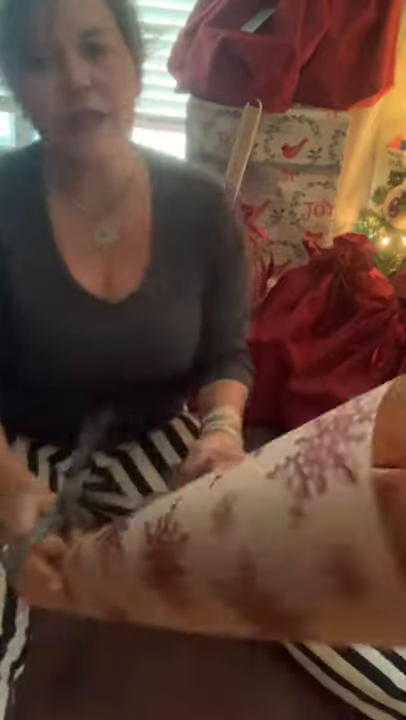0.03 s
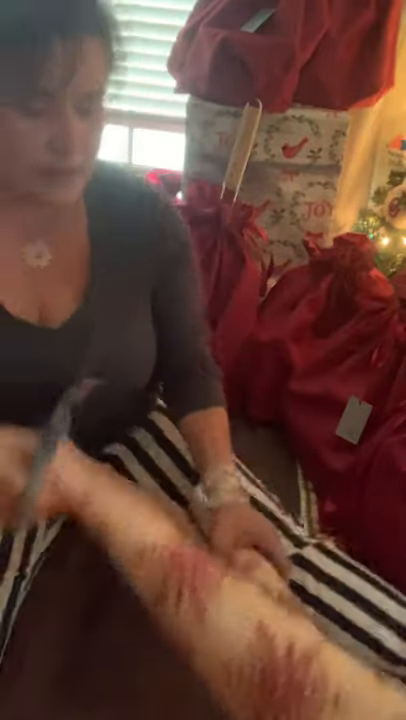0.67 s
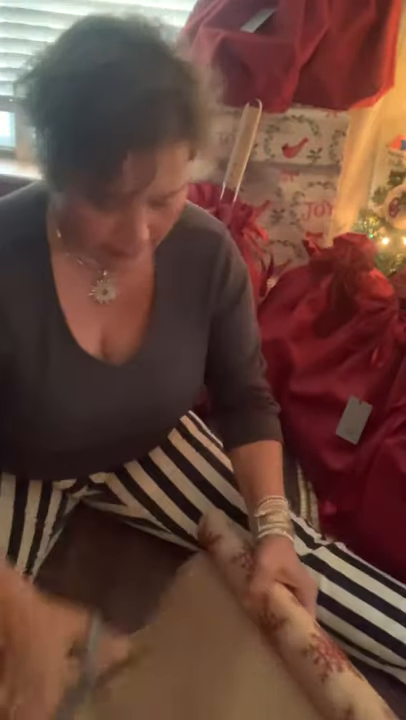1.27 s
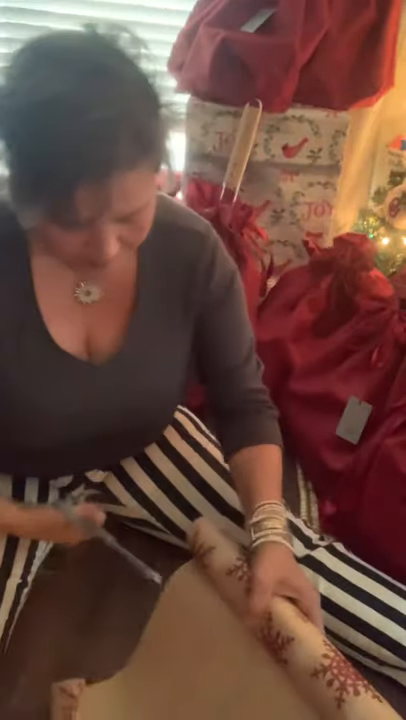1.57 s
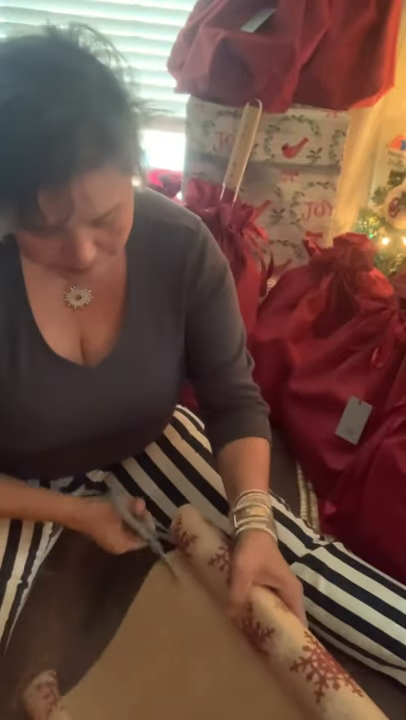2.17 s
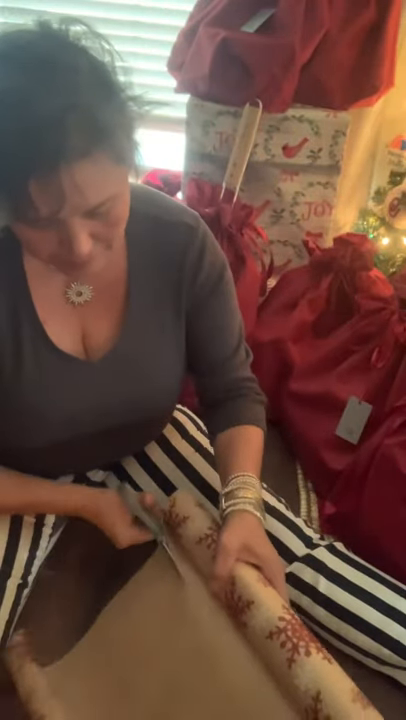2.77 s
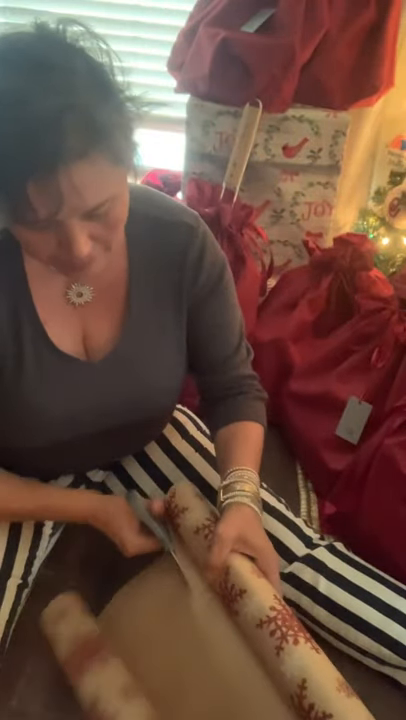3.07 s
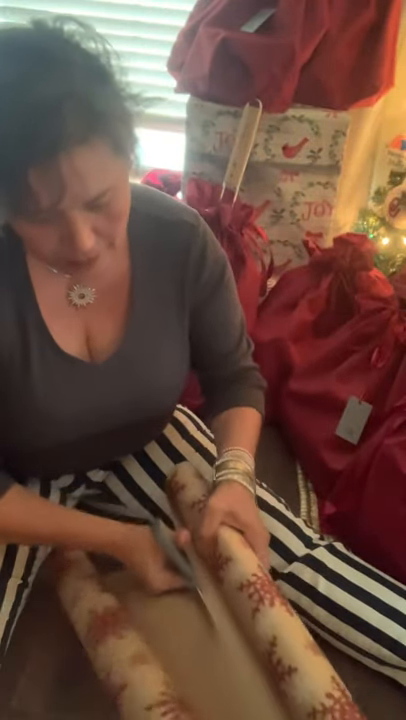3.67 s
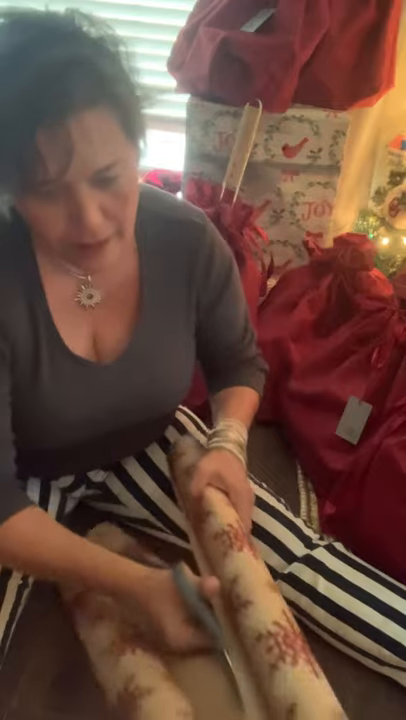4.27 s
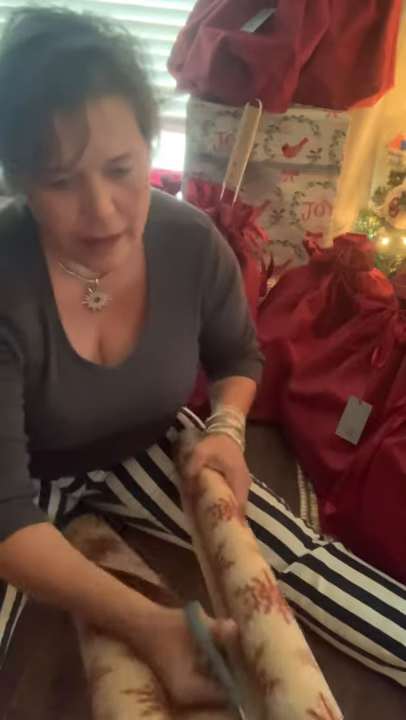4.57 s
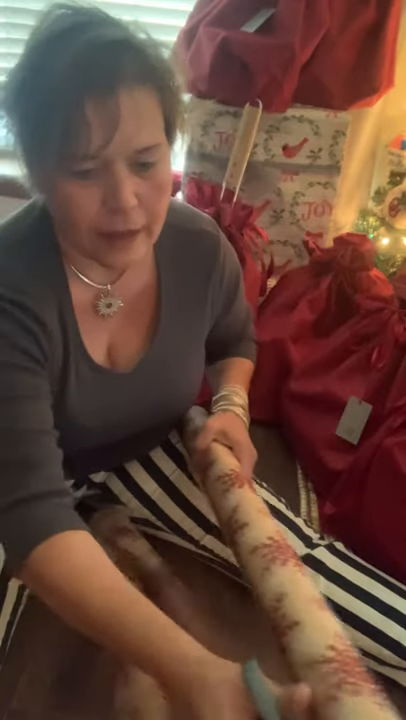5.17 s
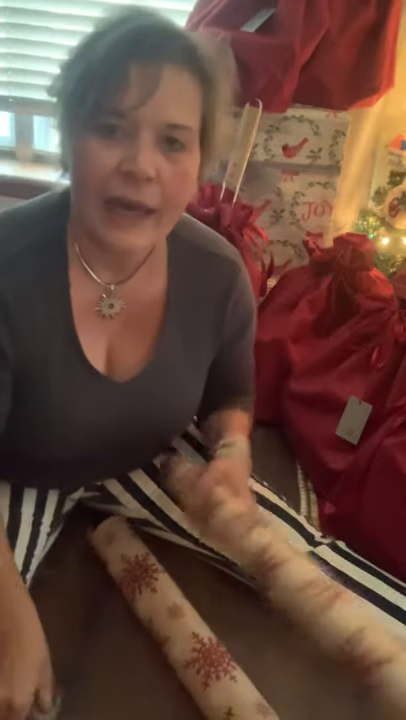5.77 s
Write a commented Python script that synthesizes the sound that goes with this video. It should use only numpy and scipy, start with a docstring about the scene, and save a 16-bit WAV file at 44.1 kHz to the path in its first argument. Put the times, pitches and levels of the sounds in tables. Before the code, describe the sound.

Wrapping paper is pulled off its roll, flapping and crinkling with sharp crackles and a few scissor clicks. Open scissors then glide through the sheet in one long, swelling rasp and hiss. The cut piece curls up, the cardboard roll bumps the floor, and the scissors are laid down with clicks and a brief metallic ring. A phone hears it from about a metre away in a quiet living room.

```python
"""Cutting wrapping paper

Paper is pulled off its roll on a living-room floor, then open scissors glide through it in one long cut.
Many tiny snaps make the sheet flap, crinkle and hiss, and the blade rasps as it sticks and slips.
The cut piece curls up, the cardboard roll bumps the floor and the scissors are laid down, ringing.
A phone with two microphones hears it from about a metre away, over a quiet rumble and hum."""
import sys
import numpy as np
from scipy import signal
from scipy.fft import rfft, irfft, next_fast_len
from scipy.io import wavfile
from scipy.ndimage import uniform_filter1d, map_coordinates

SR = 44100
rng = np.random.default_rng(int(sys.argv[2]) if len(sys.argv) > 2 else 0)


def log_audio(samples):
    """Write samples as a 16-bit WAV file to the path given in sys.argv[1]."""
    # one column per channel
    frames = np.atleast_2d(samples).T
    # limit to full scale, then quantise
    limited = np.clip(frames, -1, 1)
    pcm = np.round(limited * 32767).astype(np.int16)
    wavfile.write(sys.argv[1], SR, pcm)


N = 265173
T = np.arange(N) / SR
SIZE = next_fast_len(N + SR // 2, True)
FREQ = np.maximum(np.arange(SIZE // 2 + 1) * SR / SIZE, 1)

# the sheet is lifted, swung or bent: (start [s], length [s], flapping [dB], crinkling [dB])
SHEET_BENDS = [(0.0, 0.085, -35.5, -50), (0.147, 0.23, -36.5, -31.5), (0.291, 0.054, -36, -25),
               (0.387, 0.11, -38, -31.5), (0.526, 0.12, -40, -34.5), (0.673, 0.16, -45.5, -37.5),
               (0.816, 0.14, -34, -34), (0.88, 0.032, -31, -21.5), (0.988, 0.072, -36.5, -33),
               (1.083, 0.11, -39.5, -37.5), (1.171, 0.047, -32, -27), (1.23, 0.021, -49, -30),
               (1.283, 0.055, -38, -33), (1.444, 0.2, -47, -44.5), (1.836, 0.013, -38.5, -39),
               (1.889, 0.034, -37.5, -32), (2.12, 0.41, -46.5, -37.5), (2.592, 0.022, -36, -31.5),
               (2.613, 0.1, -35.5, -33.5), (2.739, 0.045, -38.5, -32), (4.653, 0.12, -30.5, -40),
               (5.154, 0.016, -43, -27), (5.245, 0.02, -29, -27.5), (5.409, 0.099, -34.5, -33.5),
               (5.589, 0.054, -37.5, -58), (5.724, 0.022, -34, -52)]
# the sheet slides over itself or the floor: (start [s], length [s], hiss [dB])
SHEET_SLIDES = [(-0.02, 0.058, -29.5), (0.17, 0.036, -29), (0.46, 0.25, -38), (0.815, 0.048, -35),
                (1.07, 0.11, -43.5), (1.315, 0.019, -28.5), (1.39, 0.19, -38.5), (1.705, 0.036, -46),
                (1.915, 0.091, -42), (2.056, 0.045, -39.5), (2.14, 0.075, -33.5), (2.232, 0.14, -27.5),
                (2.39, 0.15, -34), (2.63, 0.12, -32.5), (3.44, 0.041, -32), (4.875, 0.016, -24),
                (5.415, 0.11, -33), (5.575, 0.048, -36), (5.712, 0.024, -32)]
# the sheet buckles: (time [s], level [dB], treble boost [dB])
SHEET_BUCKLES = [(0.09, -27, 5), (0.163, -22.5, 0.5), (0.244, -17.5, -24), (0.272, -13, -9),
                 (0.307, -21, 4.5), (0.465, -19.5, -8), (0.549, -21, -6), (0.669, -22, -3),
                 (0.79, -20.5, -9), (0.865, -18.5, -7), (0.903, -15.5, -6), (0.958, -16, -2),
                 (1.163, -17, 1), (1.188, -14.5, -23), (1.248, -20, -5), (1.279, -20, -13),
                 (1.334, -17.5, -18), (1.598, -25, -2), (2.106, -23, -27), (2.285, -24, 7),
                 (2.584, -19.5, -6), (2.665, -15.5, -27), (2.76, -23, -14), (4.138, -12, -16),
                 (4.331, -9, -4), (4.475, -14, -3), (4.872, -16, 1), (5.205, -10, -3.5),
                 (5.218, -17.5, -10)]
# the long cut: (time [s], slicing level [dB], crinkling compared with the slicing [dB])
LONG_CUT = [(2.8, -56, 0), (2.81, -46.5, 8), (2.89, -34, 1), (3.2, -30, 0.5), (3.48, -26.5, -3),
            (3.72, -29, -1), (4.32, -22.5, -2), (4.83, -25, -3), (4.89, -22.5, -4), (4.96, -25.5, -2),
            (5.02, -26, 1), (5.13, -29.5, 0.5), (5.23, -37.5, 0), (5.37, -59, -6)]
# the scissors click; the last three columns are compared with the level:
# (time [s], level [dB], treble boost [dB], high ping [dB], ring of the blades [dB])
SCISSOR_CLICKS = [(0.997, -11.5, 0, 6, -48), (1.638, -34.5, 9, -18, -23), (1.663, -29, 4, 6, -35),
                  (2.029, -23.5, -9, -20, -39), (2.107, -9, -13.5, -22, -43), (2.131, -33.5, 10, -18, -16),
                  (2.626, -2.5, -13.5, -9, -46), (5.208, -20, -6, -18, -20), (5.419, -17.5, -2, -18, -33),
                  (5.585, -33, 4, -21, -7.5), (5.760, -9.5, -3.5, -15, -33), (5.795, -17.5, -1, -17, -20),
                  (5.844, -11.5, -5.5, -23, -19.5), (5.861, -20, -7, -18, -14), (5.934, -23, -23, -28, -15)]
# the cardboard roll is bumped: (time [s], level [dB])
ROLL_BUMPS = [(1.002, -30), (4.485, -26), (4.885, -25), (5.42, -16), (5.448, -23.5), (5.491, -34)]

# bands of rubbing noise that glide in pitch: (time [s], pitch [Hz], level [dB])
BLADE_SCRAPE_GLIDE = [(3.8, 3754, -36), (4.05, 3900, -35), (4.46, 4020, -42), (4.56, 3780, -26.5),
                      (4.68, 3470, -28), (4.8, 3200, -41), (5.05, 2980, -37)]  # paper scrapes over the blade
TAUT_SHEET_GLIDE = [(3.1, 1980, -62), (3.52, 2108, -34), (3.8, 2000, -48), (4.2, 2240, -35.5),
                    (4.4, 2203, -30.5), (4.66, 2094, -43)]  # the tight sheet resonates at the blade
EDGE_HISS_GLIDE = [(2.84, 12300, -51), (2.92, 12070, -30.5), (3.33, 12400, -41), (3.48, 12840, -28),
                   (3.8, 10300, -40), (4.1, 11400, -31)]  # the cutting edge hisses
BILLOW_GLIDE = [(0.22, 419, -55), (0.26, 404, -32.5), (0.34, 348.4, -50), (0.46, 313, -42)]  # the sheet billows
ROLL_SCRAPE_GLIDE = [(0.31, 3850, -20.5), (0.35, 3376, -26)]  # paper scrapes over the roll
CURL_GLIDE = [(3.6, 760, -47), (4.1, 749, -35.5), (4.6, 730, -49), (4.9, 672, -32), (5.08, 700, -41),
              (5.19, 650, -25), (5.25, 593, -25), (5.36, 540, -66)]  # the cut piece curls up

# the tones a struck object rings with: (pitch [Hz], level [dB], time to fade by 60 dB [s])
OPEN_BLADE_TONES = [(2930, -5, .7), (3822, -2, .9), (5712, -6, .65), (6995, -7, .45), (7620, -2, .4)]
SHUT_BLADE_TONES = [(1202, -7, .8), (2896, 0, .24), (3004, -5, .5), (3500, 7, .05), (7224, -2, .25),
                    (7827, -4, .3)]
ROLL_TONES = [(330, -10.5, 0.089), (483, -5, 0.3), (571, -1, 0.14), (641.5, 1.5, 0.12), (810, -18, 0.23),
              (1090, -22, 0.05), (2150, -8, 0.12)]
# the steady tones of mains hum: (pitch [Hz], level [dB])
HUM_TONES = [(59.3, -58.5), (120, -64)]

# tone colours, or how strong each noise is from low to high: (frequency [Hz], relative level [dB])
FLAP_COLOUR = [(100, -27.5), (150, -20.5), (280, -12.5), (400, -4), (500, -2.5), (680, 3.5), (1050, -3.5),
               (1500, -9), (3000, -36.5)]
CRINKLE_COLOUR = [(400, -29.5), (900, 0.5), (1400, -1), (2000, 1.5), (2600, -2.5), (3200, -0.5),
                  (4400, -6.5), (8000, -14.5), (15000, -37)]
HISS_COLOUR = [(1500, -27), (4500, 1), (6500, -4.5), (7800, -3), (9300, 2), (12000, 3), (13300, -4),
               (14500, -8.5), (16000, -26)]
DRUM_COLOUR = [(190, -35.5), (300, -2), (460, 6.5), (650, 0.5), (950, 2.5), (1400, -30.5)]  # the sheet under the blade
BUCKLE_COLOUR = [(100, -24), (300, -8), (650, 3.5), (1500, 3.5), (2200, 2), (4000, -1), (6500, -9),
                 (11000, -2.5), (15000, -25)]
CLICK_COLOUR = [(200, -10.5), (800, -6), (2000, 3.5), (3700, 5), (6500, 5), (9000, 6.5), (12000, 11.5),
                (16000, -11)]
THUD_COLOUR = [(40, -26), (80, -6), (125, 5), (200, -14), (600, -36)]  # the floor under the roll
RUMBLE_COLOUR = [(20, -9), (35, -4), (80, -3), (150, -12), (300, -7.5), (1000, -20.5), (16000, -29.5)]  # the quiet house

# how alike the two microphones sound: (frequency [Hz], likeness [0 to 1])
MIC_LIKENESS = [(150, .96), (550, .88), (1050, .75), (1250, .35), (1500, .55), (2200, .65), (2700, .3),
                (5000, .3), (5800, .4), (6400, .97), (7400, .9), (8300, .35), (9200, .8), (10200, .2),
                (12000, .65), (13600, .95)]
# how far the right one trails the left: (frequency [Hz], phase lag [rad])
MIC_LAG = [(100, 0), (400, -.6), (750, -1.6), (1100, -1.5), (1300, -.5), (2500, -.3), (3300, -1.4),
           (4300, -.3), (5000, -1.5), (5800, 0), (6400, 2.9), (6800, 3.4), (7400, 6.28), (8300, 9.4),
           (9200, 12.57)]
# how much louder the left one is: (frequency [Hz], left minus right [dB])
MIC_BALANCE = [(60, 13), (200, 4), (450, 7.5), (1250, 1.5), (2400, 9), (4400, 7), (6500, 2), (9500, 0.5),
               (11800, -2.5), (13500, -1)]


def paper():
    """The wide sheet flaps, its creases crinkle, and its surface and the sliced fibres hiss."""
    flapping, crinkling, hissing, cut = handling()
    catch = flicker(rate_hz=39)  # the paper catches and slips
    flap = colour(tiny_snaps(per_s=800, spread_db=2.5, decay_s=0.0027), FLAP_COLOUR)
    flap *= flapping * undb(1.2 * catch)
    creases = colour(tiny_snaps(per_s=2000, spread_db=2, decay_s=0.0022), CRINKLE_COLOUR)
    creases *= undb(1.03 * catch)
    hiss = colour(tiny_snaps(per_s=1900, spread_db=0, decay_s=0.0053), HISS_COLOUR)
    hiss *= hissing * undb(0.8 * flicker(rate_hz=59))
    rustle = flap + creases * crinkling + hiss + drumming(cut, catch)
    singing = singing_blades(cut * creases)
    return shifting_bands(floor_echo(rustle)) + undb(-22.5) * singing


def handling():
    """How strongly bending, sliding and cutting make the sheet flap, crinkle and hiss at each moment."""
    bends = np.array(SHEET_BENDS)
    swing = strokes(bends[:, [0, 1, 2]], attack_s=0.015, release_s=0.029)
    bend = strokes(bends[:, [0, 1, 3]], attack_s=0.015, release_s=0.029)
    slide = strokes(SHEET_SLIDES, attack_s=0.014, release_s=0.031)
    cut_db, cut_crinkle_db = over_time(LONG_CUT)
    cut = undb(cut_db) * during(LONG_CUT)
    held_flap, held_crinkle = undb(-54.5), undb(-48.5)  # the sheet is never quite still in the hand
    flap = together(swing, undb(-19) * cut ** 0.62, held_flap)  # grows more slowly than the slicing
    crinkle = together(bend, undb(-6) * slide, undb(cut_crinkle_db) * cut, held_crinkle)
    hiss = together(slide, undb(-16) * bend, undb(1.5) * cut)
    return flap, crinkle, hiss, cut


def slicing():
    """Fibres snap one by one as the blade sticks and slips, which also roughens its rubbing noises."""
    rasp = unit_rms(undb(3 * flicker(rate_hz=110)))
    snaps = tiny_snaps(per_s=300, spread_db=4, decay_s=0.0005)
    cut_db, _ = over_time(LONG_CUT)
    fibres = colour(snaps, CLICK_COLOUR) * undb(cut_db - 6) * during(LONG_CUT)
    scrape = glide(BLADE_SCRAPE_GLIDE, width_hz=390)
    taut_sheet = glide(TAUT_SHEET_GLIDE, width_hz=170)
    edge_hiss = glide(EDGE_HISS_GLIDE, width_hz=2300)
    return fibres + rasp * (scrape + taut_sheet + edge_hiss)


def drumming(cut, catch, full_at_db=-29.5):
    """The sheet drums under the blade, growing louder until the slicing reaches full_at_db."""
    drum = colour(tiny_snaps(per_s=400, spread_db=2.5, decay_s=0.0085), DRUM_COLOUR)
    strength = during(LONG_CUT) * np.minimum(cut / undb(full_at_db), 1)
    return drum * strength * undb(-41.5 + 2 * catch)


def singing_blades(shaking):
    """The crinkling paper shakes the open blades, so the steel sings along."""
    steel = ring(OPEN_BLADE_TONES)
    return filtered(shaking, rfft(steel / np.linalg.norm(steel[0]), SIZE))


def unrolling_and_curling():
    """The sheet billows and scrapes over its roll; later the cut piece resonates as it curls up."""
    billow = glide(BILLOW_GLIDE, width_hz=140)
    scrape = glide(ROLL_SCRAPE_GLIDE, width_hz=2600)
    curl = glide(CURL_GLIDE, width_hz=117)
    return billow + scrape + curl


def buckles():
    """Each buckle of the sheet is a quick avalanche of snaps, heard as a rough burst of noise."""
    body, bright = np.zeros((2, 2, N))
    for time_s, db, treble_db in SHEET_BUCKLES:
        snap = undb(db) * burst(decay_s=0.014, rise_s=0.002)
        add(body, time_s, snap)
        add(bright, time_s, snap * (undb(treble_db) - 1))
    uneven = unit_rms(undb(1.8 * flicker(rate_hz=730)))
    return colour((body + treble(bright, corner_hz=5700)) * uneven, BUCKLE_COLOUR)


def scissors(ping_hz=9250, ping_fade_s=0.004, shut_at_s=5.785, choke_s=0.012):
    """Steel meets steel or the floor: a dry crack, a short high ping and the ring of the blades."""
    body, bright, pings, opened, shut = np.zeros((5, 2, N))
    ping = ring([(ping_hz, 0, ping_fade_s)])
    for time_s, db, treble_db, ping_db, ring_db in SCISSOR_CLICKS:
        snap = burst(decay_s=0.0024, rise_s=0.0001)
        tail = undb(-5.5) * burst(decay_s=0.0092, rise_s=0.00091)
        crack = undb(db) * (snap + tail)
        add(body, time_s, crack)
        add(bright, time_s, crack * (undb(treble_db) - 1))
        add(pings, time_s, undb(db + ping_db) * ping)
        track, tones = (opened, OPEN_BLADE_TONES) if time_s < shut_at_s else (shut, SHUT_BLADE_TONES)
        add(track, time_s, undb(db + ring_db) * ring(tones))
    cracks = colour(body + treble(bright, corner_hz=4800), CLICK_COLOUR)
    choke = np.exp(-np.maximum(T - shut_at_s, 0) / choke_s)  # shutting stops the open blades' ring
    rattle = unit_rms(undb(5 * flicker(rate_hz=110)))  # the blades chatter against each other
    return cracks + pings + (opened * choke + shut) * rattle


def cardboard_roll():
    """A bump gives a hollow knock from the tube, a slap from its paper and a thud from the floor."""
    knock, slap = np.zeros((2, 2, N))
    for time_s, db in ROLL_BUMPS:
        add(knock, time_s, undb(db) * ring(ROLL_TONES))
        add(slap, time_s, undb(db + 1.5) * burst(decay_s=0.017, rise_s=0.0004))
    thud = undb(-29) * colour(slap, THUD_COLOUR)
    paper_slap = undb(1.5) * colour(slap, FLAP_COLOUR) + undb(-11.5) * colour(slap, BUCKLE_COLOUR)
    return treble(knock, corner_hz=323) + thud + paper_slap


def shifting_bands(sound, rate_hz=11, depth_db=1.54, count=12):
    """The bending sheet sends out each frequency band more or less strongly from moment to moment."""
    place = np.interp(FREQ ** 0.5, [200 ** 0.5, 15000 ** 0.5], [0, count - 1])
    bands = (filtered(sound, np.maximum(1 - abs(place - k), 0)) for k in range(count))
    return sum(band * undb(depth_db * flicker(rate_hz)) for band in bands)


def floor_echo(sound, echo_db=-11):
    """The sound bounces off the floor and arrives a little late; the delay wanders as the sheet moves."""
    delay_s = 0.0016 + 0.000222 * uniform_filter1d(flicker(rate_hz=3), SR // 8)
    echo = np.array([map_coordinates(row, [(T - delay_s) * SR], order=1) for row in sound])
    return (sound + undb(echo_db) * echo) / together(1, undb(echo_db))


def room_echo(sound, fade_s=0.29, level_db=-7, count=6):
    """A furnished room adds a short echo; one tail blends into the next as the hands move."""
    place = T / T[-1] * (count - 1)
    echo, t = np.zeros((2, N)), T[:SR // 3]
    for k in range(count):
        tail = rng.standard_normal((2, len(t))) * (1 - np.exp(-t / 0.00024)) * undb(-60 * t / fade_s)
        near = abs(place - k) < 1
        part = sound[:, near] * np.sqrt(1 - abs(place[near] - k))
        add(echo, T[near][0], signal.fftconvolve(part, tail / np.linalg.norm(tail[0]), axes=1))
    return undb(level_db) * echo


def background():
    """Quiet house rumble and mains hum, nearly the same at both microphones."""
    hum = sum(undb(db) * np.sqrt(2) * np.sin(2 * np.pi * (hz * T + rng.random())) for hz, db in HUM_TONES)
    air = rng.standard_normal(N) + undb(-15) * rng.standard_normal((2, N))
    return undb(-54) * colour(air, RUMBLE_COLOUR) + hum


def tiny_snaps(per_s, spread_db, decay_s, patches=8, renew_s=0.16):
    """Each snap rings one small patch of paper; new patches keep forming as the sheet bends."""
    span, t = int(renew_s * SR), T[:SR // 60]
    spans, track = N // span + 1, np.zeros((2, N))
    when, patch, size, sign = rng.random((N // 8, 4))[:int(per_s * T[-1])].T
    place = (patch * patches).astype(int) * spans * span + (when * N).astype(int)
    strength = np.sign(sign - 0.5) * undb(spread_db * np.sqrt(3) * (2 * size - 1))
    kicks = np.bincount(place, strength, patches * spans * span).reshape(patches, 1, spans, span)
    rings = rng.standard_normal((patches, 2, spans, len(t))) * np.exp(-t / decay_s)
    pieces = signal.fftconvolve(kicks, rings, axes=-1).sum(axis=0)
    for k in range(spans):
        add(track, k * span / SR, pieces[:, k])
    return unit_rms(track)


def glide(rows, width_hz):
    """Rubbing noise in a band whose pitch glides as the paper changes shape."""
    hz, db = over_time(rows)
    sway = filtered(rng.standard_normal((2, 2, N)), 1 / (1 + (2 * FREQ / width_hz) ** 2))
    phase = 2 * np.pi * np.cumsum(hz) / SR
    band = unit_rms(sway[0] * np.cos(phase) + sway[1] * np.sin(phase))
    return band * undb(db) * during(rows) ** 2


def ring(tones):
    """The fading tones of a struck object: in step towards the listener, out of step to the sides."""
    hz, db, fade_s = np.transpose(tones)[:, :, None]
    t, gain = T[:SR], undb(db)
    waves = gain * np.exp((2j * np.pi * hz - np.log(1000) / fade_s) * t)
    start_turns = np.array([np.zeros(len(hz)), rng.random(len(hz))])
    return (np.exp(2j * np.pi * start_turns) @ waves).imag / np.sqrt(np.sum(gain ** 2) / 2)


def burst(decay_s, rise_s):
    """Noise that swells and dies, with different detail in two directions."""
    t = T[:SR // 4]
    return rng.standard_normal((2, len(t))) * np.exp(-t / decay_s) * (1 - np.exp(-t / rise_s))


def strokes(rows, attack_s, release_s):
    """The combined strength of hand movements that each swell, hold and die away."""
    power = np.zeros(N)
    for start_s, length_s, db in rows:
        swell = np.clip((T - start_s) / attack_s, 0, 1)
        fade = np.exp(-np.maximum(T - start_s - length_s, 0) / release_s)
        power += (undb(db) * swell * fade) ** 2
    return np.sqrt(power)


def flicker(rate_hz):
    """A smooth random wobble with a typical size of 1."""
    step = int(SR / rate_hz)
    stairs = np.repeat(rng.standard_normal(N // step + 1), step)[:N]
    return unit_rms(uniform_filter1d(stairs, step))


def during(rows, fade_s=0.022):
    """1 while a table lasts, fading to 0 outside it."""
    return np.clip(1 + np.minimum(T - rows[0][0], rows[-1][0] - T) / fade_s, 0, 1)


def over_time(rows):
    """Join the points of a time table, giving one curve for each column of values."""
    times, *columns = np.transpose(rows)
    return [np.interp(T, times, column) for column in columns]


def over_frequency(points):
    """Join the points of a frequency table into a curve."""
    hz, value = np.transpose(points)
    return np.interp(np.log(FREQ), np.log(hz), value)


def colour(sound, points):
    """Give a sound a tone colour; white noise keeps its power."""
    cepstrum = irfft(np.log(unit_rms(undb(over_frequency(points)))), SIZE)
    # fold the filter so that it rings only after a snap, never before
    cepstrum[1:SIZE // 2] *= 2
    cepstrum[SIZE // 2 + 1:] = 0
    return filtered(sound, np.exp(rfft(cepstrum)))


def treble(sound, corner_hz):
    """The part of a sound above a corner frequency."""
    return filtered(sound, 1 / (1 + (corner_hz / FREQ) ** 6))


def filtered(sound, response):
    """Multiply each frequency by its own gain."""
    return irfft(rfft(sound, SIZE) * response, SIZE)[..., :N]


def add(track, time_s, sound):
    """Mix a sound in at a given time."""
    start = max(int(time_s * SR), 0)
    track[:, start:start + sound.shape[1]] += sound[:, :N - start]


def together(*strengths):
    """Unrelated noises add up by their power."""
    return np.sqrt(sum(strength ** 2 for strength in strengths))


def undb(db):
    """Turn decibels into a gain."""
    return 10 ** (np.asarray(db) / 20)


def unit_rms(x):
    """Scale to an average power of 1."""
    return x / np.sqrt(np.mean(x ** 2))


def two_microphones(sound):
    """Make left and right from two rows: what the microphones share and what sets them apart."""
    shared, apart = rfft(sound, SIZE)
    likeness = np.clip(over_frequency(MIC_LIKENESS), 0, 1)
    lean = undb(over_frequency(MIC_BALANCE))
    shared *= np.sqrt((1 + likeness) / 2)
    apart *= np.sqrt((1 - likeness) / 2)
    left = (shared + apart) * lean
    right = (shared - apart) * np.exp(-1j * over_frequency(MIC_LAG))
    return irfft(np.array([left, right]) * np.sqrt(2 / (1 + lean ** 2)), SIZE)[:, :N]


def scene():
    """The paper, its roll and the scissors in the room, over the quiet background."""
    sheet = unrolling_and_curling() + paper() + slicing() + buckles() + cardboard_roll()
    steel = scissors()
    echo = room_echo(sheet + undb(-2) * steel)  # the scissors are near, so they stir the room less
    return two_microphones(sheet + steel + echo) + background()


def record(dry, top_hz=15900):
    """The phone clips at full scale and cuts the highest treble."""
    low_pass = signal.ellip(8, 0.2, 70, top_hz, fs=SR, output="sos")
    return signal.sosfilt(low_pass, np.clip(dry, -1, 1))


dry = scene()
out = record(dry)
log_audio(out)
```